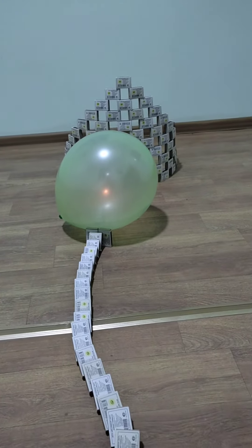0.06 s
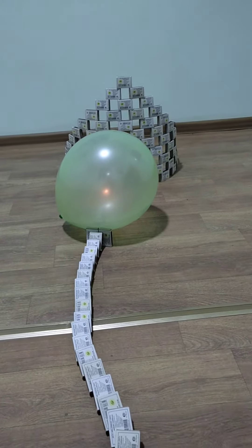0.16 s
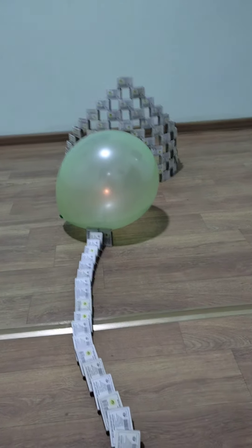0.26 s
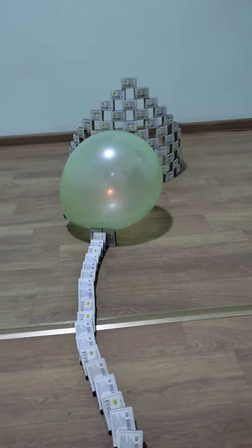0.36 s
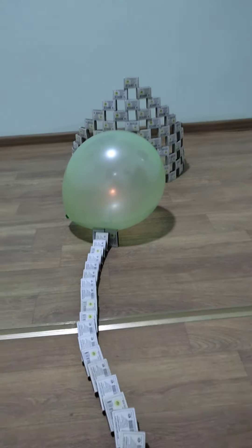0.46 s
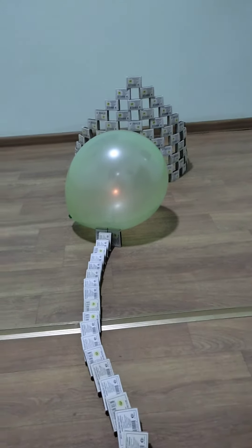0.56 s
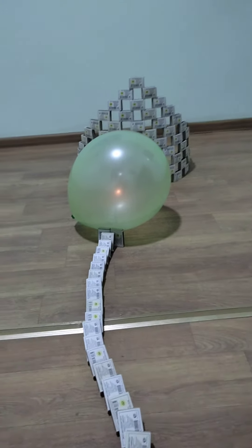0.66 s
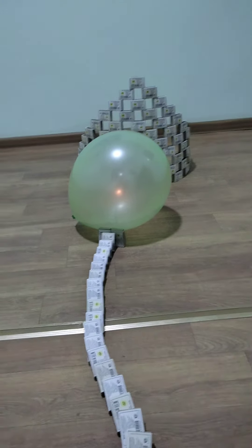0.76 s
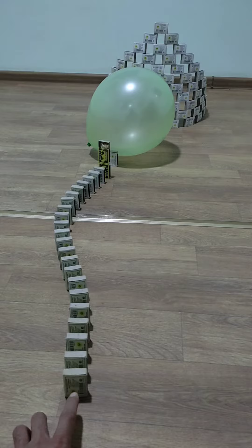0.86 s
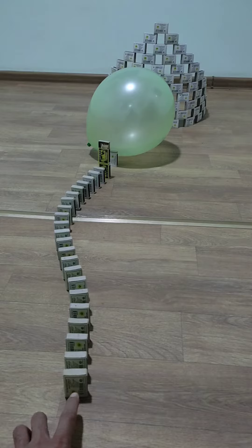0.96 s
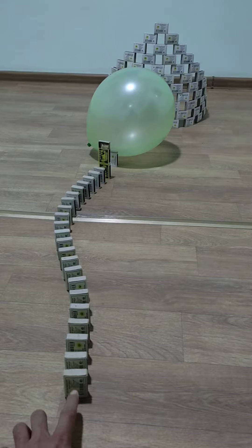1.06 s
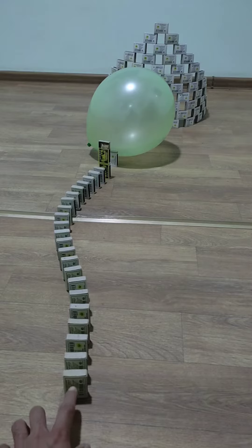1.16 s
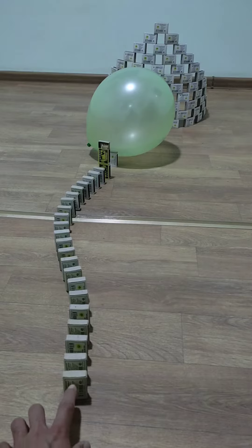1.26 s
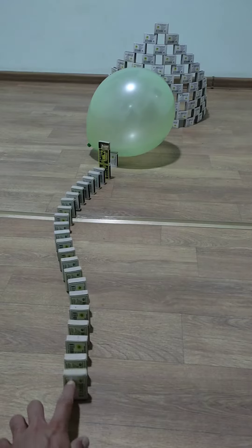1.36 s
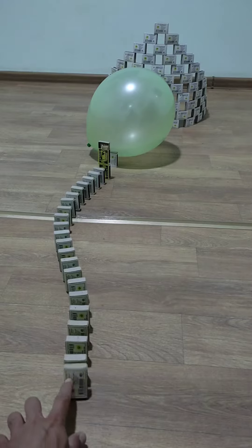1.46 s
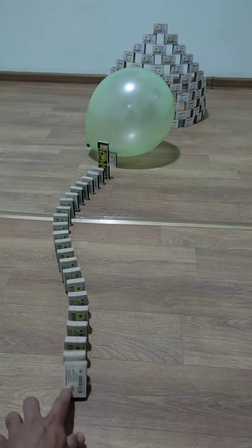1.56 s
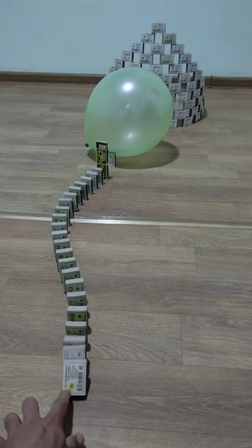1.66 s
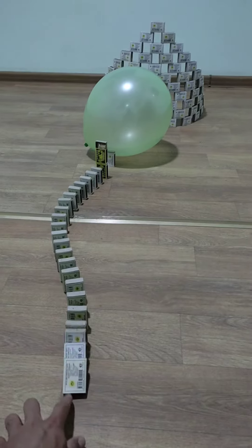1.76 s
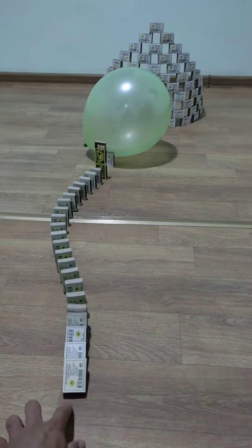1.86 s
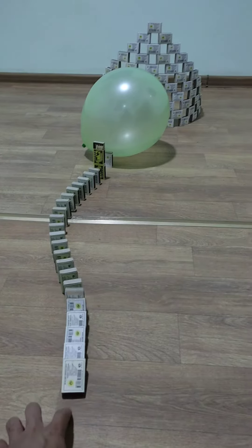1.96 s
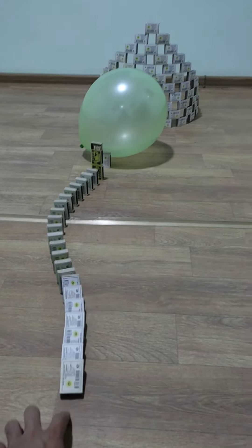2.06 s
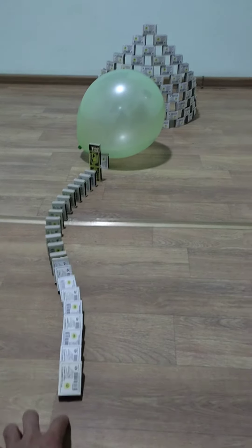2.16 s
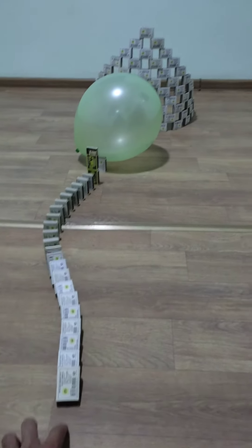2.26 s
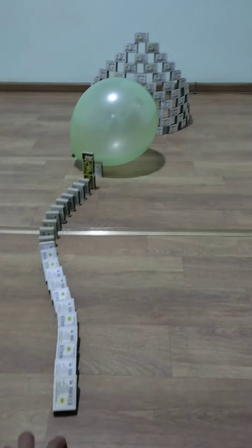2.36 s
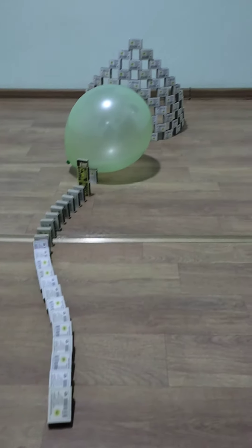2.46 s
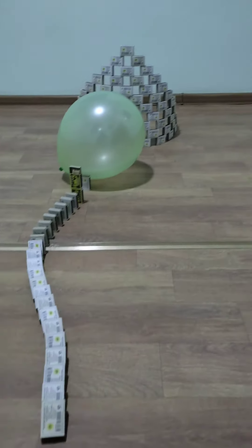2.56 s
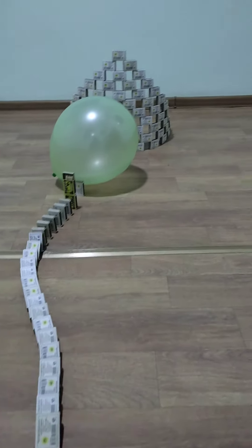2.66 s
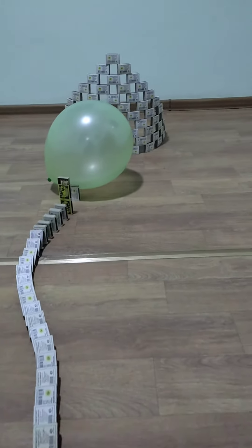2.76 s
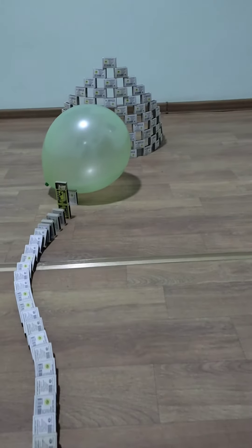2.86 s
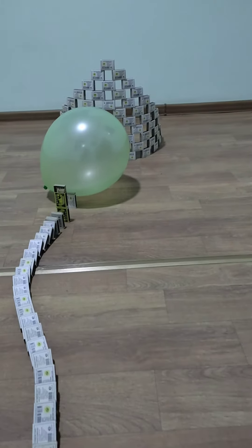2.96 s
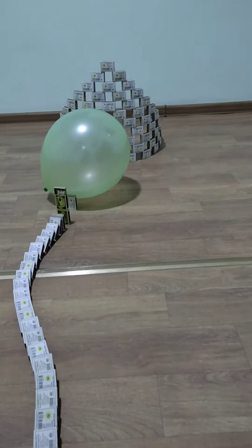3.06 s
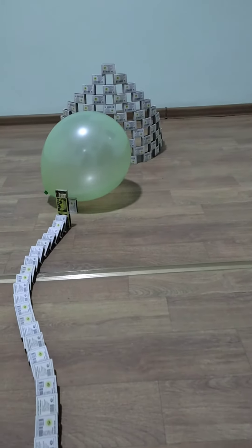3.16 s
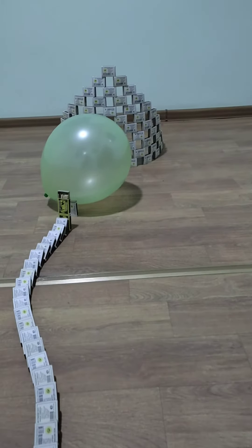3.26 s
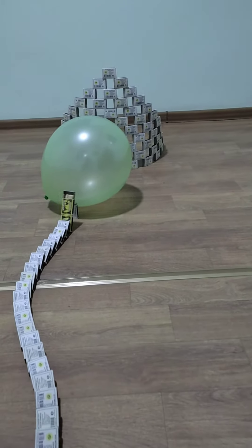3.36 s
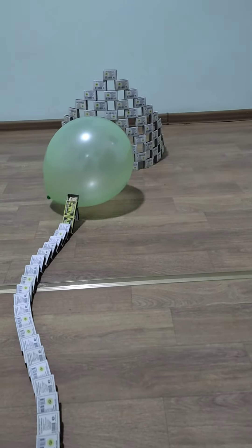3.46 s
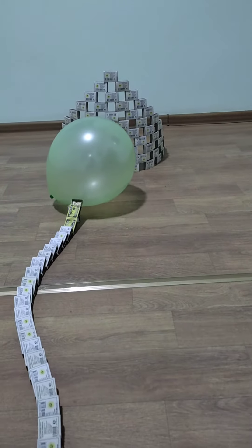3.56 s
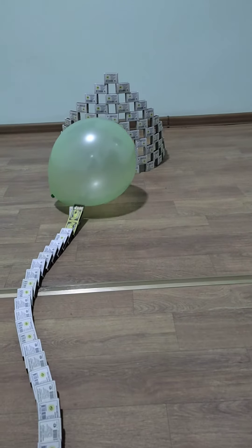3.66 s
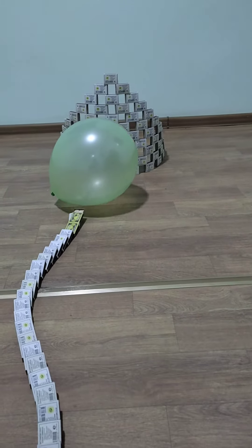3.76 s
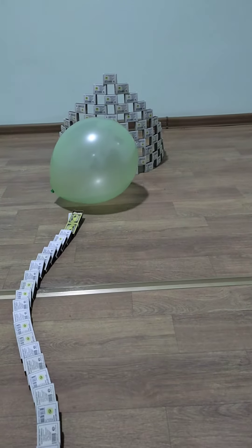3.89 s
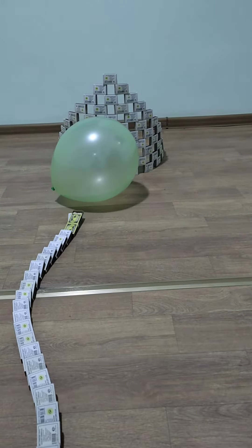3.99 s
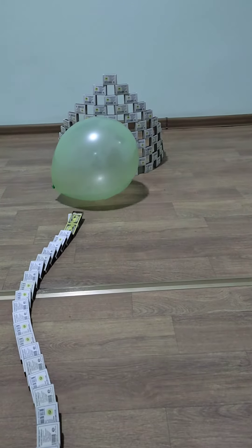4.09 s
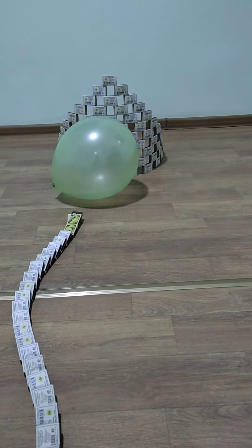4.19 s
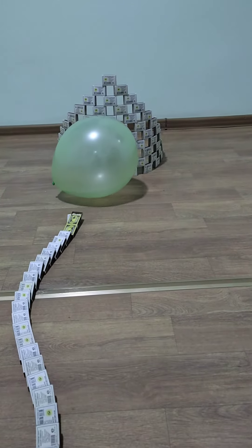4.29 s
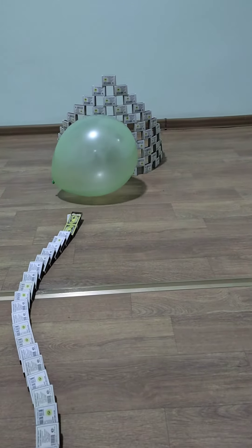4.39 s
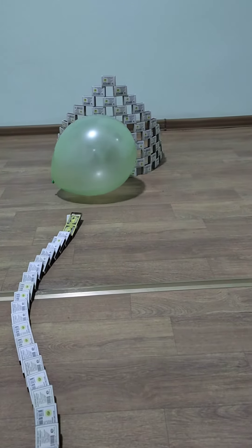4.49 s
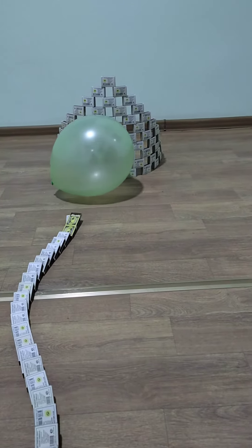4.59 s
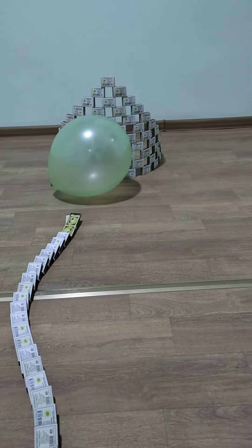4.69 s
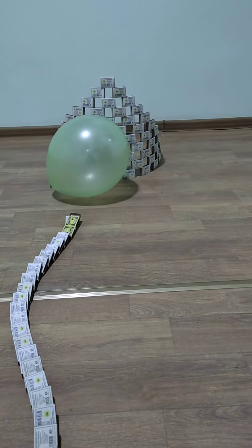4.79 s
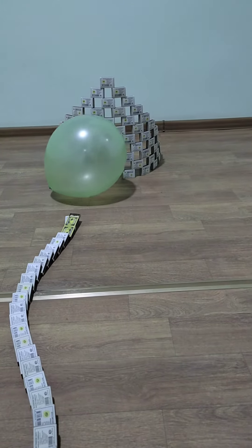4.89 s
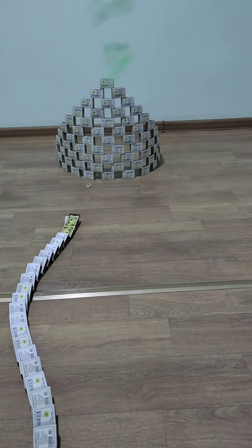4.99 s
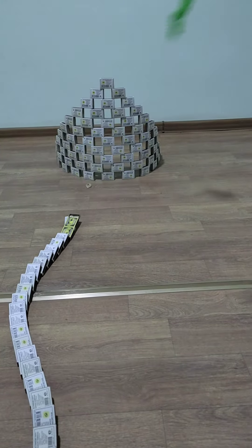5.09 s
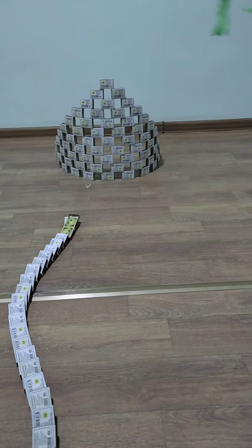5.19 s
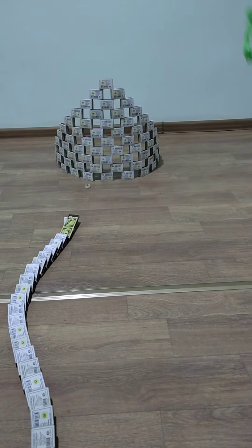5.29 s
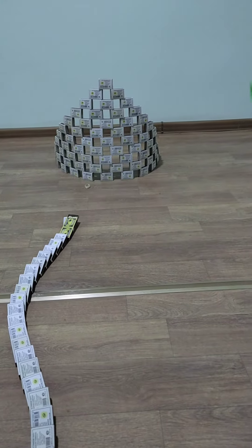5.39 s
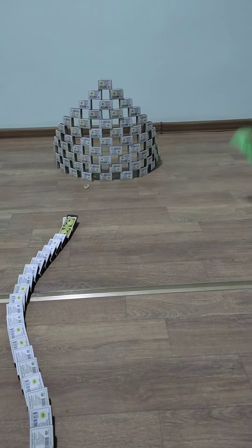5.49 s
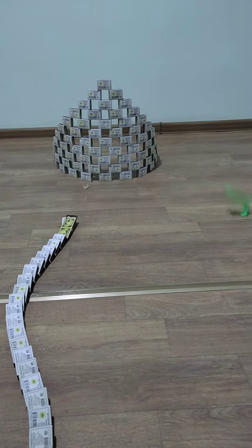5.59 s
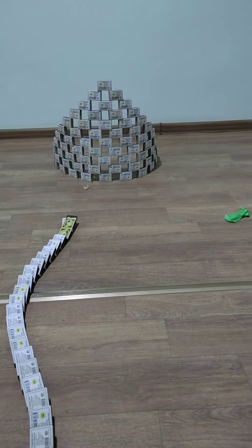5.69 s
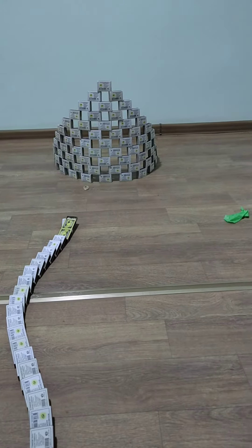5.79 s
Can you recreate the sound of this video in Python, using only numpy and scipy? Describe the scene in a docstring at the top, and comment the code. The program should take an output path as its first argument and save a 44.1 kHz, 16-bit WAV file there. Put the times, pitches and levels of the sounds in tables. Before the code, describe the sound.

Soft room noise with two tiny ticks cuts to silence, then a barely audible thin squeak. About two dozen quick, dry cardboard clacks run together over fine match rattle, followed by heavier knocks and a rattling shake. A faint balloon bump precedes one violent pop, flattened by a phone microphone, with echoes fading slowly in the hard empty room.

```python
"""First comes a soft room hush with two faint ticks, then a short silence that ends on a thin squeak.
Matchboxes topple like dominoes in a bare, echoing room: short noise bursts ring and clack, tiny clicks rattle.
A last, larger box falls, bounces and nudges a balloon, which thuds, rolls onto a pin and bursts as one pulse.
Fading noise makes the echoes. The bang overloads a phone microphone, and its gain control rides the long boom.
"""
import sys
import numpy as np
from scipy import signal
from scipy.fft import rfft, irfft
from scipy.io import wavfile
from scipy.ndimage import uniform_filter1d, minimum_filter1d

SR = 44100
rng = np.random.default_rng(int(sys.argv[2]) if len(sys.argv) > 2 else 0)


def dump(signal):
    """Clip the signal to [-1, 1] and save it as 16-bit WAV at the path in sys.argv[1]."""
    limited = np.clip(np.atleast_2d(signal).T, -1, 1)
    pcm = np.round(limited * 32767).astype(np.int16)
    wavfile.write(sys.argv[1], SR, pcm)


N = 257544  # length [samples]

# Small boxes falling one on the next: (time [s], level [dB], ring [Hz])
SMALL_BOXES = [(1.716, -34, 1420), (1.8225, -31, 3140), (1.866, -39, 1500), (1.907, -25.5, 3500),
               (1.9858, -27.5, 1560), (2.0515, -24.5, 3570), (2.121, -28, 2322), (2.1276, -23, 3170),
               (2.1854, -26.5, 3070), (2.2445, -26.5, 3000), (2.3225, -20.5, 1830), (2.3878, -18.5, 3020),
               (2.4608, -31.5, 1850), (2.523, -29, 2000), (2.606, -27, 2520), (2.682, -23.5, 2360),
               (2.737, -25, 1760), (2.7966, -27, 2400), (2.8696, -33, 2030), (2.9, -33.5, 2360),
               (2.956, -33, 1712), (3.035, -28.5, 1480), (3.073, -34, 1910), (3.1228, -30.5, 1876),
               (3.205, -26, 2410)]
# The larger box and the balloon knocking: (time [s], level [dB], ring [Hz], floor tap [dB],
# treble [dB], room [dB], contact length [s]); tap, treble and room are relative to the level
BIG_KNOCKS = [(3.432, -44.5, 1780, -17, -10, 3.5, 0.0037), (3.476, -25.5, 2500, -22.5, -16, 1, 0.01),
              (3.603, -17, 2100, -41, -18, 2.5, 0.0019), (3.799, -17.5, 4180, -17, -12, 2, 0.0031),
              (3.8803, -19.5, 2630, -29, -6, -4, 0.0015), (4.558, -47.5, 2090, -8, -41, 10, 0.0035)]
# Loose matches rattling and cardboard sliding: (time [s], level [dB])
RATTLE_LEVEL = [(1.2, -100), (1.27, -74), (1.41, -65.5), (1.75, -59.5), (2.06, -54), (2.68, -53),
                (3.31, -61.5), (3.7, -55), (4.1, -74)]
# The balloon is bumped: (time [s], level [dB], room [dB, relative to the level])
BALLOON_BUMPS = [(3.473, -31.5, 3), (3.791, -51, -22), (4.548, -47, 1)]
# Faint bright ticks: (time [s], level [dB])
FAINT_TICKS = [(0.3935, -45), (0.5462, -46)]
# Shreds of rubber landing: (time [s], level [dB])
RUBBER_SHREDS = [(5.57, -28), (5.791, -29.5)]
# Room hush and microphone noise, before a small left-right offset: (time [s], level [dB])
HUSH_LEVEL = [(0, -60.5), (.7, -61), (1.1, -57.5), (3, -62), (5.84, -60.5)]
# A low rumble that swells and fades: (time [s], level [dB])
RUMBLE_LEVEL = [(1.2, -63), (1.53, -54.5), (1.7, -64), (2.23, -54), (2.65, -54), (2.93, -58.5),
                (3.52, -59.5), (3.65, -52), (4.11, -85)]
# Start and end of the silence: (start [s], end [s])
SILENCE = (.714, 1.086)

# Tone colours; only the balance within each matters: (frequency [Hz], level [dB])
# Cardboard clack
BOX_COLOUR = [(300, -28.5), (500, -12), (900, -13), (1600, 1.5), (2200, -1), (3200, -4.5), (4500, -9),
              (5100, -15), (6600, -9), (8000, -48), (14000, -53)]
# Bright edge of a knock: (frequency [Hz], level [dB])
EDGE_COLOUR = [(3000, -37), (5000, -10.5), (6600, -2), (8000, -9), (10500, -13), (12200, -2), (14300, -9)]
# Tap in the floor: (frequency [Hz], level [dB])
FLOOR_COLOUR = [(88, -53), (150, -17.5), (334, -10), (462, -0.5), (511, 0), (835, -7), (1100, -14),
                (1430, -50.5), (2420, -120)]
# Rattling matches and tearing rubber: (frequency [Hz], level [dB])
RUSTLE_COLOUR = [(300, -42.5), (600, -15), (1000, -17.5), (1600, -3.5), (2200, -3.5), (3200, -7),
                 (4300, -4), (5500, -12.5), (8000, -25.5), (12200, -15.5), (14300, -7.5)]
# Taut balloon skin: (frequency [Hz], level [dB])
SKIN_COLOUR = [(24, -62), (40, -42), (81, -8), (216, -5), (278, -7), (318, -3.5), (567, -16.5), (600, -9),
               (780, -52), (1320, -120)]
# Papery touches: (frequency [Hz], level [dB])
TICK_COLOUR = [(880, -69), (1500, -20), (2290, -12), (2520, -10), (2960, -17), (3220, -11.5), (5660, -10.5),
               (14300, -16)]
# Boom of the burst: (frequency [Hz], level [dB])
BANG_COLOUR = [(25, -53), (55, -39.5), (110, -12), (220, -5), (300, -2), (450, -4.5), (620, -11.5),
               (800, -23), (1200, -14), (2000, -11), (4000, -17.5), (6500, -19), (8700, -25.5),
               (12000, -19), (14300, -20)]
# Hush: (frequency [Hz], level [dB])
HUSH_COLOUR = [(18, -82), (30, -54), (89, -8.5), (134, -9), (230, -9.5), (283, -12), (385, -15),
               (416, -11.5), (450, -15.5), (735, -19), (836, -18), (903, -19), (2960, -25.5), (5350, -31),
               (14300, -38)]
# Rumble: (frequency [Hz], level [dB])
RUMBLE_COLOUR = [(80, -24.5), (200, -14), (310, -4.5), (420, -12), (700, -25.5)]

# How long the room takes to fade by 60 dB: (frequency [Hz], time [s])
ROOM_FADE = [(60, 3.15), (200, 2.05), (420, 1.12), (560, 0.64), (800, 0.51), (1100, 0.93), (2000, 1.11),
             (3100, 1.18), (4500, 0.94), (8000, 0.61), (13000, 0.36)]
# How alike left and right are in the reverberation: (frequency [Hz], likeness [-1 to 1])
LEFT_RIGHT_LIKENESS = [(60, 0.99), (130, 0.89), (280, 0.76), (620, 0.55), (1340, -0.2), (2920, 0.074),
                       (6350, -0.16), (13800, -0.098)]
# How much stronger the left side is: (frequency [Hz], left minus right [dB])
LEFT_RIGHT_BALANCE = [(60, 2), (130, 1.5), (280, 3), (620, 2), (1340, 3), (2920, -0.5), (6350, -2.5),
                      (13800, 4.5)]

# Small boxes: floor tap and bright edge, relative to each knock's level
TAP_DB, EDGE_DB = -25, -24
# A knock at the reference level has this contact length; it shrinks by exp(-share) for each dB above
REFERENCE_DB, CONTACT_S, SHORTER_PER_DB = -27, 0.0033, 0.13
# Room feed of a knock at the reference level, and the rise for each dB above it
WET_DB, WET_RISE_PER_DB = -0.5, 0.09
RING_WIDTH_HZ = 520
# A hard shake of matches swells and dies around the larger box's 3.8 s knock
SHAKE_S, SHAKE_DB, SHAKE_RISE_DB_PER_S, SHAKE_FALL_DB_PER_S = 3.82, -35, 500, 300
# Burst: moment, boom strength, time scale of the pulse, strength and time scale of the tear
BURST_S, BURST_DB, BURST_PULSE_S, TEAR_DB, TEAR_S = 5.0022, 44.5, 0.00062, 22.5, 0.0014
# Reverberation strength, its build-up time, and strength of the first echoes before they fade with delay
ROOM_DB, BUILD_UP_S, ECHO_DB = -24.5, 0.0032, -8.5
# A fainter tail, this many times slower, returns from the adjoining space
NEXT_DOOR_DB, NEXT_DOOR_STRETCH = -39, 3.23
SQUEAK_END_S, SQUEAK_HZ, SQUEAK_FLUTTER, SQUEAK_DB = 1.23, 2235, 0.53, -68.5
# Gain control removes a share of the excess over a threshold, waits, then lets go steadily;
# the depths below then scale its dB for each band
THRESHOLD_DB, SHARE, ATTACK_S, WAIT_S, RELEASE_DB_PER_S = -12, 0.52, 0.0025, 0.31, 26.5
CROSSOVER_HZ, BASS_DEPTH, TREBLE_DEPTH = 660, 0.96, 1.19
# Ceilings where the waveform flattens: each band, then the whole
BASS_TOP, TREBLE_TOP, WHOLE_TOP = 0.75, 0.55, 0.79


def from_db(db):
    """Turn decibels into a plain multiplier."""
    return 10 ** (np.asarray(db) / 20)


def rms_one(x):
    """Scale to an average strength (rms) of one."""
    return x / np.sqrt(np.mean(x ** 2) + 1e-20)


def in_time(rows):
    """Join (time, value) points with straight lines."""
    return np.interp(np.arange(N) / SR, *np.transpose(rows))


def at_hz(points, hz):
    """Read a value between (frequency, value) points on a logarithmic pitch scale."""
    points = np.array(points)
    return np.interp(np.log(hz + 1), np.log(points[:, 0]), points[:, 1])


def colour(x, spectrum, size=8192):
    """Shape the tone with a filter that reacts as early as it can; white noise keeps its rms."""
    gain = from_db(at_hz(spectrum, np.arange(size // 2 + 1) * SR / size))
    # Folding the cepstrum (spectrum of the log spectrum) makes the filter minimum-phase
    cepstrum = irfft(np.log(rms_one(gain)))
    cepstrum[1:size // 2] *= 2
    cepstrum[size // 2 + 1:] = 0
    response = irfft(np.exp(rfft(cepstrum)))
    shaped = signal.fftconvolve(np.atleast_2d(x), response[None], axes=1)[:, :N]
    return shaped.reshape(np.shape(x))


def clicks(times, db):
    """A sudden blow is a single sample per event."""
    out = np.zeros(N)
    out[np.round(np.asarray(times) * SR).astype(int)] = from_db(db)
    return out


def puffs(times, gains, lengths, spikiness):
    """Uneven contacts make short dying noise bursts, each of unit energy before its gain."""
    size = 2048
    out, t = np.zeros(N + size), np.arange(size) / SR
    draws = rng.standard_normal((len(times), 2, size))
    for s, gain, length, (fine, unevenness) in zip(times, gains, lengths, draws):
        swell_and_fade = t * np.exp(-t / max(length, 2e-4))
        burst = fine * from_db(spikiness * unevenness) * swell_and_fade
        start = round(s * SR)
        out[start:start + size] += gain * burst / np.sqrt(np.sum(burst ** 2))
    return out[:N]


def hollow_ring(clack, times, ring_hz):
    """Trapped air and cardboard resonate: each clack excites a broad, quickly dying ring."""
    out, r = np.zeros(N), np.exp(-np.pi * RING_WIDTH_HZ / SR)
    for start, hz in zip((times * SR).astype(int), ring_hz):
        piece = np.r_[clack[start:start + 400], np.zeros(500)]
        forward = [(1 - r * r) / 2, 0, (r * r - 1) / 2]
        feedback = [1, -2 * r * np.cos(2 * np.pi * hz / SR), r * r]
        out[start:start + 900] += signal.lfilter(forward, feedback, piece)
    return out


def knocks():
    """Each knock is a hollow cardboard ring, a broad clack, a tap in the floor and a bright edge."""
    small = []
    for s, db, hz in SMALL_BOXES:
        harder_db = db - REFERENCE_DB
        room_db = WET_DB + WET_RISE_PER_DB * harder_db
        length = CONTACT_S * np.exp(-SHORTER_PER_DB * harder_db)
        small.append((s, db, hz, TAP_DB, EDGE_DB, room_db, length))
    s, db, hz, tap_db, edge_db, room_db, length = np.transpose(small + BIG_KNOCKS)
    clack = puffs(s, from_db(db + 12.5), length, spikiness=4.2)
    near = from_db(14) * hollow_ring(clack, s, hz) + from_db(-4) * colour(clack, BOX_COLOUR)
    near += colour(puffs(s, from_db(db + edge_db - 10), length, spikiness=4.1), EDGE_COLOUR)
    # What the room receives
    far = colour(clicks(s, db + room_db + 8.5), BOX_COLOUR) + from_db(-8.5) * near
    far += colour(clicks(s, db + room_db + edge_db + 20.5), EDGE_COLOUR)
    tap = colour(clicks(s, db + tap_db + 19.5), FLOOR_COLOUR)
    return near + tap, far + tap


def rattle():
    """Loose matches strike each other in many tiny clicks of uneven size."""
    t = np.arange(N) / SR
    present = rng.random(N) < 700 / SR  # about 700 clicks a second
    sizes = from_db(6.1 * np.minimum(rng.exponential(1, N), 5))
    grains = present * sizes * rng.choice([-1, 1], N)
    playing = (t > SILENCE[1]) & (t < RATTLE_LEVEL[-1][0])
    since = t - SHAKE_S
    shake_db = SHAKE_DB + np.minimum(SHAKE_RISE_DB_PER_S * since, -SHAKE_FALL_DB_PER_S * since)
    level = from_db(in_time(RATTLE_LEVEL)) + from_db(shake_db)
    return colour(rms_one(grains) * playing * level, RUSTLE_COLOUR)


def thuds():
    """Soft blows on the balloon's taut skin give a low, rounded sound, near and in the room."""
    s, db, room_db = np.transpose(BALLOON_BUMPS)
    near = colour(clicks(s, db + 15), SKIN_COLOUR)
    far = colour(clicks(s, db + room_db + 11.5), SKIN_COLOUR)
    return near, far


def burst():
    """Trapped air leaves as one pressure pulse while rubber tears; the room takes a single blow."""
    t = np.maximum(np.arange(N) / SR - BURST_S, 0) / BURST_PULSE_S
    pulse = from_db(35.5) * t * np.exp(-t) * (1 - t / 2)
    tear = colour(puffs([BURST_S], [from_db(TEAR_DB)], [TEAR_S], spikiness=1.1), RUSTLE_COLOUR)
    boom = colour(clicks([BURST_S], BURST_DB), BANG_COLOUR)
    return pulse + tear, boom


def ticks():
    """Faint ticks and landing rubber shreds are short, bright, papery noise bursts."""
    s, db = np.transpose(FAINT_TICKS + RUBBER_SHREDS)
    return colour(puffs(s, from_db(db + 17), [0.009] * len(s), spikiness=1.9), TICK_COLOUR)


def room(x):
    """Stereo reverberation: third-octave bands of noise, each dying at its own rate."""
    size = 3 * SR
    t = np.arange(size) / SR
    octave = np.log2(np.arange(size // 2 + 1) / 3 + 1)  # frequency bins are 1/3 Hz apart
    white, response = rfft(rng.standard_normal((2, size))), 0
    for centre in np.arange(5, 14.1, 1 / 3):
        hz = 2 ** centre
        band = np.cos(np.pi / 2 * np.clip(3 * (octave - centre), -1, 1)) ** 2
        noise = irfft(white * band)
        level = np.sqrt(uniform_filter1d(noise ** 2, int(12 * SR / 2 ** (centre / 2) / 8)))
        # Many resonances share a band, so its level runs evenly
        mid, side = noise * (noise.std() / level) ** 0.33
        alike = np.clip(at_hz(LEFT_RIGHT_LIKENESS, hz), -1, 1)
        pair = np.sqrt((1 + alike) / 2) * mid + np.sqrt((1 - alike) / 2) * side * [[1], [-1]]
        decay_db = -60 * t / at_hz(ROOM_FADE, hz)
        next_door = from_db(NEXT_DOOR_DB + decay_db / NEXT_DOOR_STRETCH)
        response = response + pair * (from_db(decay_db) + next_door)
    response = response * from_db(ROOM_DB) * (1 - np.exp(-t / BUILD_UP_S))  # echoes thicken at first
    # Distinct first echoes from floor and walls
    lags = (rng.uniform(0.003, 0.045, size=(2, 12)) * SR).astype(int)
    for channel, lag in zip(response, lags):
        channel[lag] += from_db(ECHO_DB - 250 * lag / SR) * rng.choice([-1, 1], size=12)
    return signal.fftconvolve(x[None], response, axes=1)[:, :N]


def squeak():
    """A thin tone flutters in strength and fades out just after the silence."""
    t = np.arange(N) / SR
    flutter = 1 + SQUEAK_FLUTTER * rms_one(uniform_filter1d(rng.standard_normal(N), size=400))
    fade = (t > SILENCE[0]) * np.clip((SQUEAK_END_S - t) / 0.04, 0, 1)
    return from_db(SQUEAK_DB) * flutter * np.sin(2 * np.pi * SQUEAK_HZ * t) * fade


def rumble():
    """Low stereo noise swells and fades, starting after one second."""
    noise = colour(rng.standard_normal((2, N)), RUMBLE_COLOUR)
    return from_db(in_time(RUMBLE_LEVEL)) * (np.arange(N) > SR) * noise


def hush():
    """Steady stereo noise of room and microphone, slightly stronger on the right."""
    level = from_db(in_time(HUSH_LEVEL) + [[-1], [1]])
    return level * colour(rng.standard_normal((2, N)), HUSH_COLOUR)


def scene():
    """Add the direct sounds, their reverberation and the background."""
    knock, knock_far = knocks()
    thud, thud_far = thuds()
    pop, boom = burst()
    matches, tick = rattle(), ticks()
    direct = knock + thud + pop + matches + tick + from_db(-5.5) * boom
    into_room = knock_far + thud_far + matches + from_db(-6) * tick + boom
    heard = direct + room(into_room)
    left = colour(heard[0], [(hz, db / 2) for hz, db in LEFT_RIGHT_BALANCE])
    right = colour(heard[1], [(hz, -db / 2) for hz, db in LEFT_RIGHT_BALANCE])
    return np.array([left, right]) + hush() + rumble() + squeak()


def gain_control(x):
    """Gain in dB drops quickly on loud sound, stays down a while, then climbs back."""
    power = uniform_filter1d(np.mean(x ** 2, axis=0), 882, origin=220)  # 20 ms average
    excess_db = np.maximum(10 * np.log10(np.maximum(power, 1e-12)) - THRESHOLD_DB, 0)
    wanted = -SHARE * excess_db
    wait = round(WAIT_S * SR) // 2 * 2 + 1
    held = minimum_filter1d(wanted, wait, origin=wait // 2)
    # Let the gain rise no faster than the release rate
    climb = RELEASE_DB_PER_S * np.arange(N) / SR
    released = np.minimum.accumulate(held - climb) + climb
    step = 1 / (ATTACK_S * SR)
    return signal.lfilter([step], [1, step - 1], released)


def overload(x, top):
    """An overloaded microphone flattens peaks near its ceiling."""
    return x / (1 + (x / top) ** 6) ** (1 / 6)


def record(dry):
    """Gain control bites harder on the treble; the first cycles of the bang still overload."""
    gain_db = gain_control(dry)
    bass = signal.sosfiltfilt(signal.butter(2, CROSSOVER_HZ, fs=SR, output="sos"), dry)
    treble = dry - bass
    bass = overload(bass * from_db(BASS_DEPTH * gain_db), BASS_TOP)
    treble = overload(treble * from_db(TREBLE_DEPTH * gain_db), TREBLE_TOP)
    x = overload(bass + treble, WHOLE_TOP)
    # Cut to silence with 4 ms edges
    t = np.arange(N) / SR
    x = x * np.clip(np.maximum(SILENCE[0] - t, t - SILENCE[1]) / 0.004 + 0.5, 0, 1)
    # Remove the highest treble: at least 50 dB down from 14650 Hz up
    lowpass = signal.cheby2(14, 50, 14650, fs=SR, output="sos")
    return np.clip(signal.sosfilt(lowpass, x), -1, 1)


dry = scene()
out = record(dry)
dump(out)
```